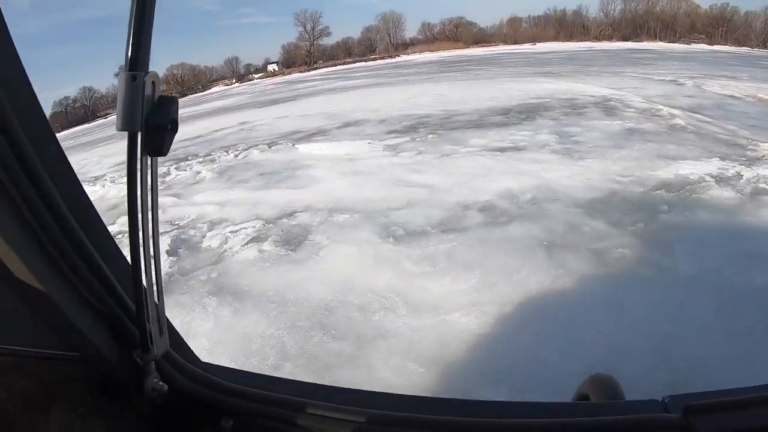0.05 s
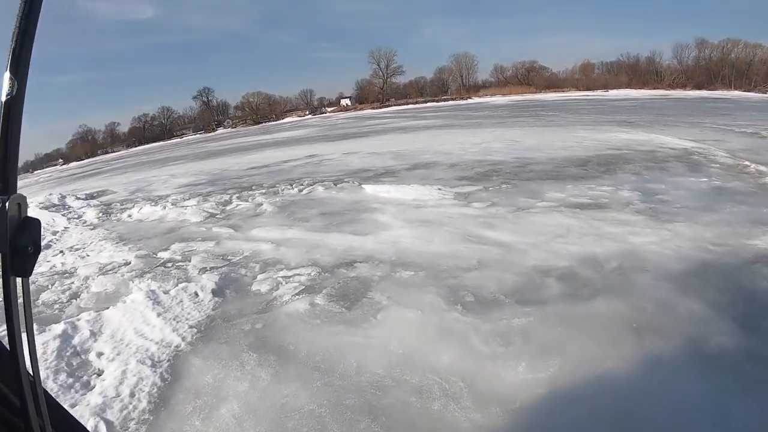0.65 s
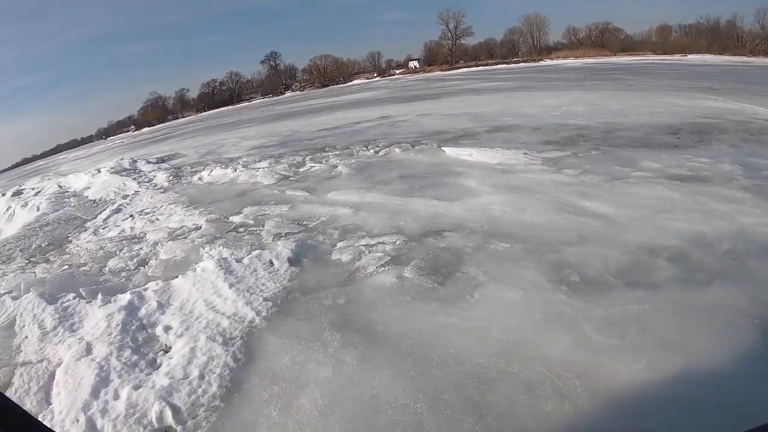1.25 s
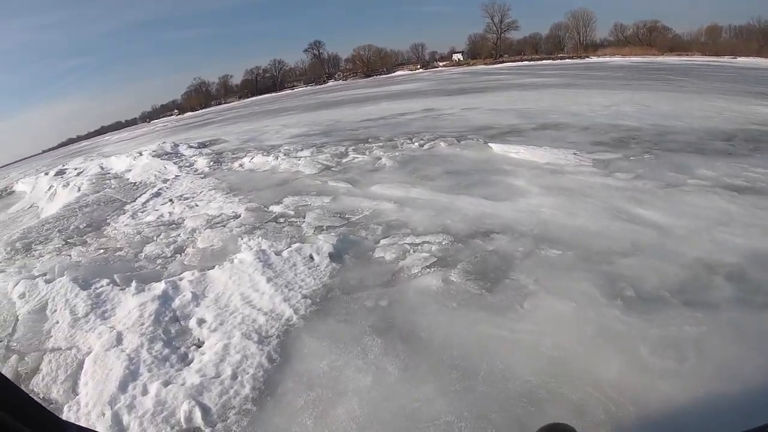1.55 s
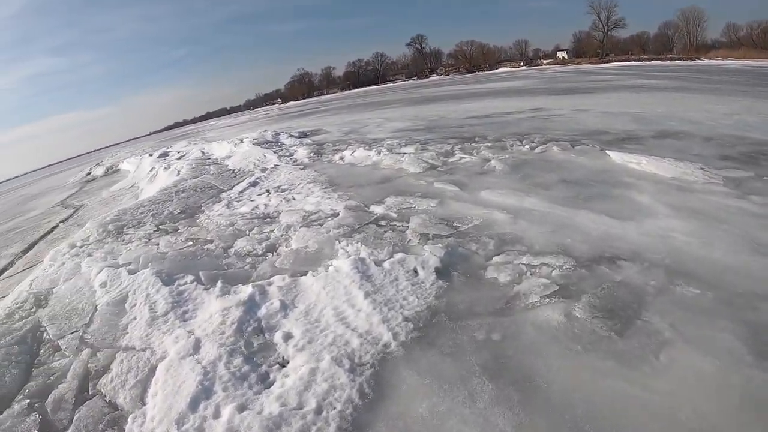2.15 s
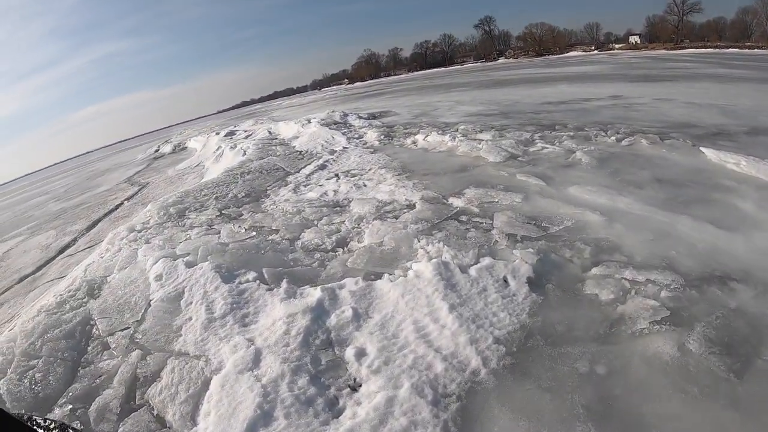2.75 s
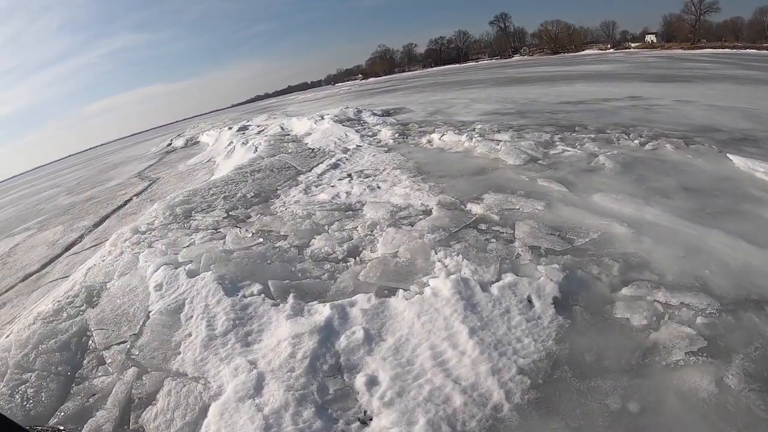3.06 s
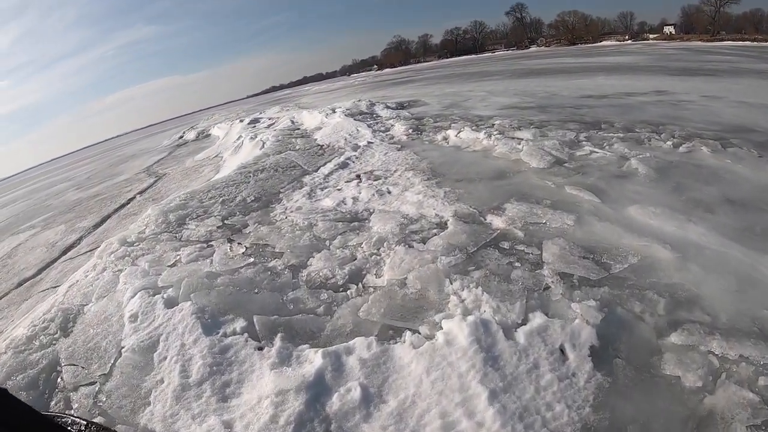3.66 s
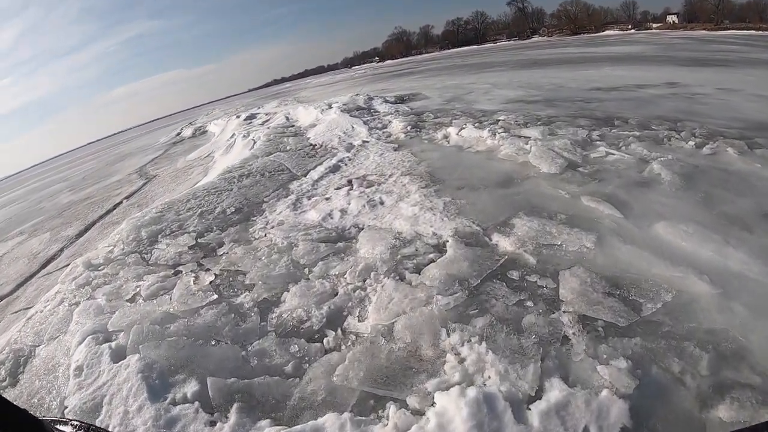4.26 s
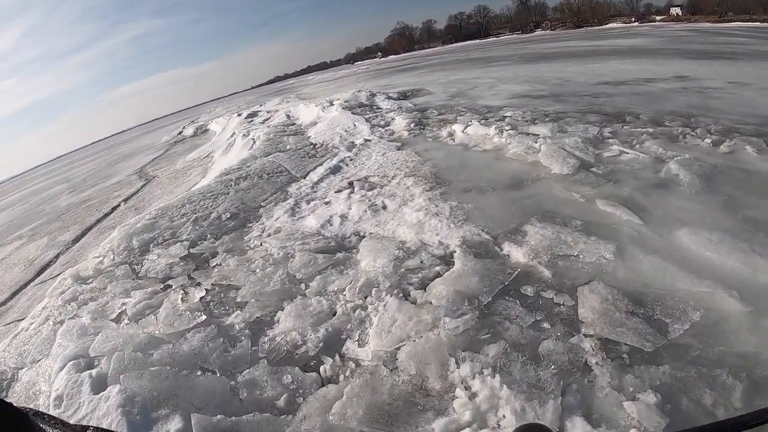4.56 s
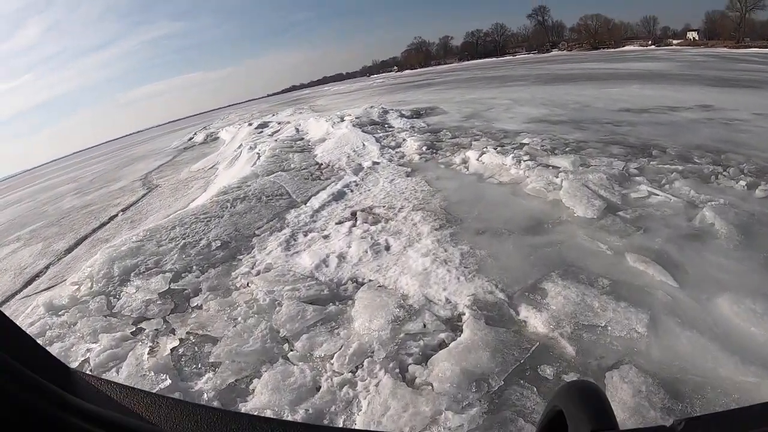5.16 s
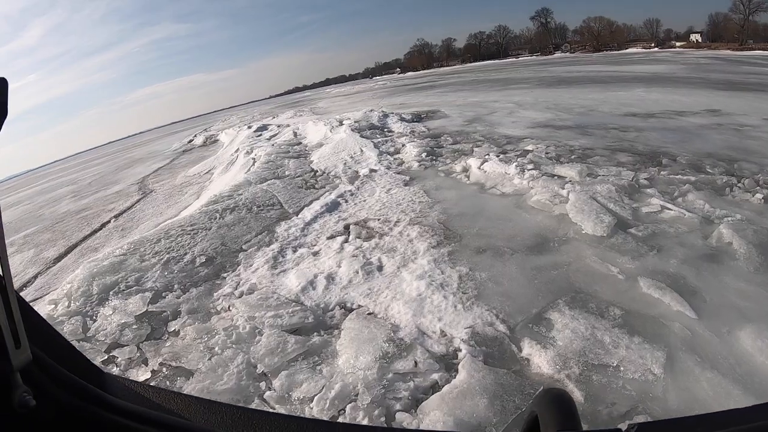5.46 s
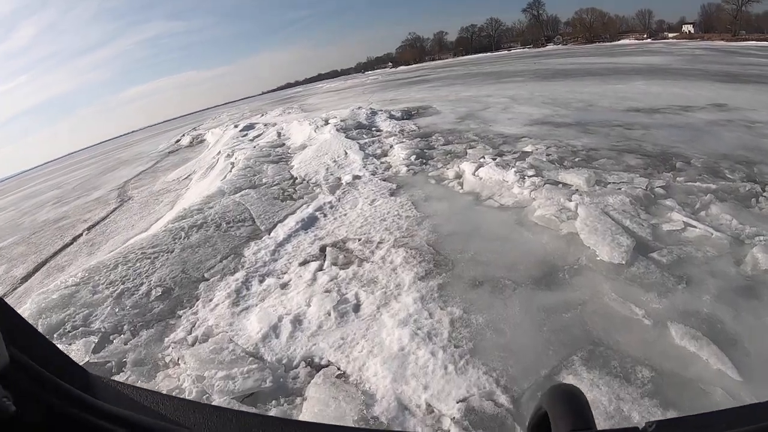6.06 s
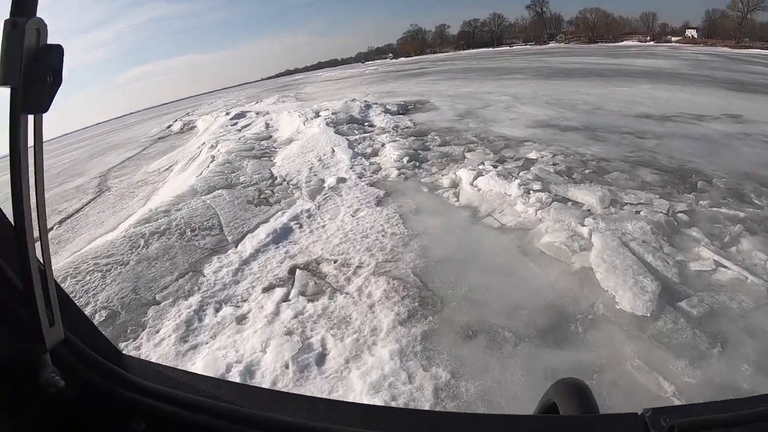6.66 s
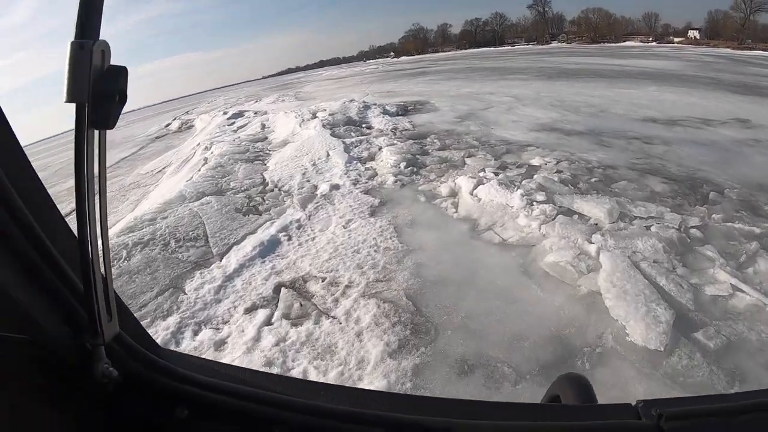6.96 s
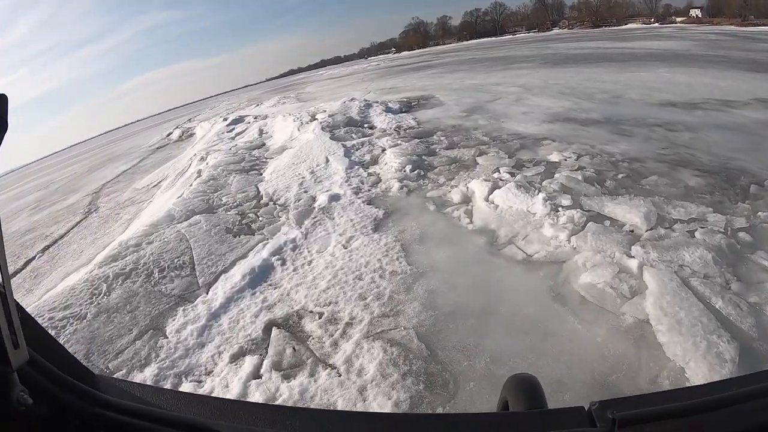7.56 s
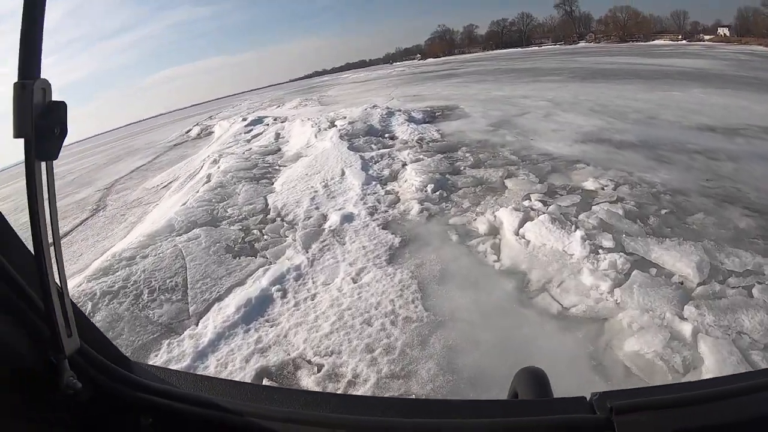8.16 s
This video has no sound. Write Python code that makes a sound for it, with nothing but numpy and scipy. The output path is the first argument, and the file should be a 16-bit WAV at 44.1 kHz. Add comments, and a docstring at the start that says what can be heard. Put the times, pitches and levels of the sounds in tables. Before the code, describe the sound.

A diesel engine drones low and steady for the whole eight seconds or so, heard inside the booming cab of an off-road vehicle. Its speed barely changes. A light clatter, a thin wavering whine and a faint airy whistle sit above the drone, while soft tyres rumble over ice below it. Snow crunches and squeaks very faintly under the tread. The drone dips briefly with soft bumps at about 1.4 and 3 seconds. A light, sharp knock comes at 4.5 seconds, then louder hollow bodywork knocks at 5.5 and 5.7 seconds. A faint ice crackle follows near 6.3 seconds. The ride gets rougher around 7 seconds, with a quick cluster of rattling knocks and a deep tyre thud at 7.6 seconds. The drone wavers over these bumps and carries on to the end.

```python
"""Diesel cab on a frozen lake

Inside an all-terrain vehicle at an even pace. The exhaust drones at the firing rate, the cab booms,
and the engine clatters under a thin whine and an airy whistle. Big soft tyres rumble and crunch
over snowy ice that squeaks and snaps, and a few bumps make the bodywork knock."""
import sys
import numpy as np
from scipy import signal
from scipy.fft import rfft, irfft
from scipy.io import wavfile
from scipy.ndimage import uniform_filter1d

SR = 44100
rng = np.random.default_rng(int(sys.argv[2]) if len(sys.argv) > 2 else 0)


def int16_out(signal):
    """Quantize to a 16-bit WAV file."""
    q = np.round(np.clip(np.atleast_2d(signal).T, -1, 1) * 32767)
    wavfile.write(sys.argv[1], SR, q.astype(np.int16))


N = 366464
T = np.arange(N) / SR


def from_db(db):
    """Decibels to gain."""
    return 10 ** (np.asarray(db) / 20)


def unit_power(x):
    """Scale to an RMS of one."""
    return x / np.sqrt(np.mean(x ** 2) + 1e-20)


def automation(rows):
    """Breakpoints to curves, one for each column after the time."""
    times, *columns = np.transpose(rows)
    return [np.interp(T, times, column) for column in columns]


def swell(t, spread):
    """A bell-shaped fade in and out around time t."""
    return np.exp(-.5 * np.minimum(((T - t) / spread) ** 2, 100))


def drift(rate_hz):
    """A smooth random modulator of unit power."""
    hz = np.fft.rfftfreq(N, 1 / SR)
    return unit_power(irfft(rfft(rng.standard_normal(N)) / (1 + (hz / rate_hz) ** 2) ** 2, N))


def clicks(per_s):
    """Scattered impulses of random strength."""
    return (rng.random(N) < per_s / SR) * rng.standard_normal(N)


def equalise(x, curve):
    """Apply an EQ curve that rolls off beyond its ends; unit power."""
    hz = np.fft.rfftfreq(N, 1 / SR) + 1e-3
    points_hz, points_db = np.transpose(curve)
    gain = from_db(np.interp(np.log(hz), np.log(points_hz), points_db))
    ends = np.minimum(hz / points_hz[0], 1) * np.minimum(points_hz[-1] / hz, 1)
    return unit_power(irfft(rfft(x) * gain * ends ** 2, N))


def resonate(x, modes):
    """Parallel resonators of alternating polarity; unit power."""
    out = 0
    for k, (hz, width, db) in enumerate(modes):
        r = np.exp(-np.pi * width / SR)
        zeros = [(1 - r * r) / 2, 0, (r * r - 1) / 2]
        poles = [1, -2 * r * np.cos(2 * np.pi * hz / SR), r * r]
        out = out + (-1) ** k * from_db(db) * signal.lfilter(zeros, poles, x + 1e-18)
    return unit_power(out)


def pass_filter(x, hz, kind):
    """Second-order low- or high-pass."""
    return signal.sosfilt(signal.butter(2, min(hz, SR / 2 - 1), kind, fs=SR, output="sos"), x)


def firing_noise(firings, depth, decay_cycles, uneven_db):
    """Noise that flares at each firing and falls back; no two firings are equally strong."""
    index = firings.astype(int) - int(firings.min())
    strength = from_db(uneven_db * rng.standard_normal(N)[index])
    flare = unit_power(strength * np.exp(-(firings % 1) / decay_cycles))
    return unit_power(rng.standard_normal(N) * (1 + depth * flare))


# how hard the engine shakes the cab: t/s, level/dB
CAB_SHAKE = [(0, -18), (0.6, -22), (0.8, -19), (1.15, -21.5), (1.55, -17.5), (1.78, -19.5), (2.0, -19),
             (2.3, -20.5), (2.88, -18.5), (3.04, -26.5), (3.25, -26), (3.5, -19.5), (4.1, -21.5),
             (4.42, -23.5), (4.58, -19.5), (5.5, -21), (6.08, -23), (6.36, -20.5), (6.6, -22),
             (6.85, -18.5), (7.0, -30), (7.12, -23.5), (7.3, -31), (7.6, -23.5), (8.05, -22.5),
             (8.22, -28.5), (8.31, -27)]
# air modes of the cab: f/Hz, width/Hz, gain/dB
AIR_MODES = [(178.3, 15.9, 2), (220.7, 16.5, 2), (253.8, 28.6, -3.5), (317.3, 35, -7.5), (367.6, 53.5, -9)]
def cab_boom(firings, trim_db=-5.5):
    """Uneven firings set the air in the cab booming."""
    shake_db, = automation(CAB_SHAKE)
    air = resonate(firing_noise(firings, depth=0.38, decay_cycles=0.24, uneven_db=0.37), AIR_MODES)
    air = pass_filter(pass_filter(air, 430, "low"), 112, "high")
    return from_db(shake_db + trim_db) * unit_power(air)


# engine load, riding the clatter and the exhaust's overtones: t/s, gain/dB
ENGINE_LOAD = [(0, 0.7), (3.4, 0.05), (4.6, -0.4), (6.4, 0.07), (7.3, -0.2), (8.31, 0.5)]
# tone of the engine block: f/Hz, gain/dB
BLOCK_EQ = [(200, -8.5), (400, 4.5), (700, 3), (1000, -2.5), (1350, -5.5), (2000, -10), (3000, -17),
            (3700, -21), (4600, -23.5), (5100, -32), (5600, -39.5), (8000, -48.5)]
# ringing panels: f/Hz, width/Hz, gain/dB
PANEL_RING = [(458.4, 50, -4), (531, 31, -1), (588.5, 30.3, 0), (624.5, 31, 1), (688, 38, -5),
              (781, 49, -9)]
def clatter(firings, block_db=-37, panels_db=-35.5):
    """Combustion knock: broad bursts from the block, and the panels that they set ringing."""
    block = equalise(firing_noise(firings, depth=0.15, decay_cycles=0.34, uneven_db=2.6), BLOCK_EQ)
    panels = resonate(firing_noise(firings, depth=0.51, decay_cycles=0.49, uneven_db=2.3), PANEL_RING)
    panels = unit_power(pass_filter(pass_filter(panels, 980, "low"), 325, "high"))
    load_db, = automation(ENGINE_LOAD)
    return from_db(load_db + block_db) * block + from_db(load_db + panels_db) * panels


# rumble from rough ice: t/s, level/dB
ICE_ROUGHNESS = [(0, -21), (0.4, -22), (3.0, -25), (4.3, -26), (5.2, -27.5), (6.9, -19.5), (7.35, -28),
                 (7.7, -20.5), (8.31, -24)]
# wheels dropping over ridges: t/s, thud level/dB, drone ducking/dB, spread/s
RIDGES = [(1.442, -22, 12, 0.03), (2.96, -23.5, 5.5, 0.095), (6.308, -36, 9, 0.03),
          (6.93, -22, -1.5, 0.031), (7.098, -33, 9.5, 0.045), (7.585, -11, 2, 0.03),
          (7.722, -28, 8.5, 0.063), (8.2, -30, 4, 0.084)]
# low end of the tyres: f/Hz, gain/dB
RUMBLE_EQ = [(10, -13), (20, -12), (32, -3), (43, -5.5), (70, 1.5), (90, -3.5), (107, 1), (124, -6),
             (160, -9), (260, -34)]
def tyre_rumble():
    """Soft tyres rumble over the ice and thud on ridges."""
    rumble_db, = automation(ICE_ROUGHNESS)
    thuds = sum(from_db(db) * swell(t, spread) for t, db, _, spread in RIDGES)
    return np.hypot(from_db(rumble_db), thuds) * equalise(rng.standard_normal(N), RUMBLE_EQ)


# partials of the drone: multiple of the firing rate, relative level/dB, waver/dB
DRONE_PARTIALS = [(.5, -24.5, 8), (1, 2, 0), (4, -29, 4), (5, -30, 5.5), (8, -32.5, 6)]
# hum an octave above the firing rate: t/s, level/dB
OCTAVE_HUM = [(0, -24.5), (0.85, -25), (1.03, -29), (1.3, -25), (2.0, -27.5), (2.85, -26), (4.1, -25.5),
              (4.55, -31.5), (5.0, -27.5), (6.4, -26.5), (7.8, -28.5), (8.31, -37)]
def exhaust(firings, base_db=-17, waver_db=0.5, load_follow=1.5):
    """Exhaust pulses make a drone that most ridges duck; its second and third orders ride separately."""
    def partial(order):
        # pipe and cab delay the higher orders more
        return np.sqrt(2) * np.cos(2 * np.pi * order * firings - np.pi / 2 * (order - 1) ** 2)
    shake_db, = automation(CAB_SHAKE)
    load_db, = automation(ENGINE_LOAD)
    octave_db, = automation(OCTAVE_HUM)
    duck_db = sum(db * swell(t, spread) for t, _, db, spread in RIDGES)
    drone_db = base_db + waver_db * drift(19) - duck_db
    drone = 0
    for order, db, unsteady_db in DRONE_PARTIALS:
        lift_db = (order > 1) * load_follow * load_db
        drone += from_db(drone_db + db + lift_db + unsteady_db * drift(5.5)) * partial(order)
    return drone + from_db(octave_db) * partial(2) + from_db(shake_db - 5.5) * partial(3)


# faders of the whine: t/s, upper tone/dB, lower tone/dB
WHINE_FADERS = [(0, -41, -34), (0.55, -43.5, -53), (1.1, -36.5, -44), (1.6, -49, -38),
                (2.079, -36.5, -39.5), (2.4, -45, -38), (3.1, -40.5, -39), (3.55, -38, -36.5),
                (4.001, -37.5, -39.5), (4.5, -40, -36), (4.9, -34.5, -48), (5.15, -36.5, -51),
                (5.8, -35.5, -51.5), (6.3, -41.5, -44), (6.5, -34.5, -44), (6.799, -42, -48),
                (7.35, -35.5, -50), (7.7, -41.5, -42), (8.31, -39, -48)]
def whine(firings, orders=(10, 9), trim_db=-1.5, waver_db=1.2, wobble_cycles=.05):
    """Two thin tones follow the crankshaft, with a slight wobble in pitch."""
    wobble = wobble_cycles * drift(4)
    out = 0
    for order, db in zip(orders, automation(WHINE_FADERS)):
        tone = np.sqrt(2) * np.sin(2 * np.pi * (order * firings + wobble))
        out += from_db(db + trim_db + waver_db * drift(5.1)) * tone
    return out


# glide of the whistle: t/s, f/Hz, level/dB
WHISTLE_GLIDE = [(0, 1221, -49), (1.3, 1156, -49), (2.25, 904, -47), (3.3, 925, -43.5), (6.2, 948, -47.5),
                 (6.8, 1096, -50), (7.2, 1229, -49), (7.55, 1117, -49.5), (8.31, 946, -47)]
def whistle(width_hz=130):
    """An airy whistle from the engine bay: a narrow band of noise that wanders in pitch."""
    hz, db = automation(WHISTLE_GLIDE)
    phase = 2 * np.pi * np.cumsum(hz) / SR
    return from_db(db) * (drift(width_hz) * np.cos(phase) + drift(width_hz) * np.sin(phase))


# bed of snow under the tyres: t/s, level/dB
SNOW_BED = [(0, -63), (0.3, -73), (0.55, -68), (1.1, -69.5), (1.85, -68.5), (2.15, -69.5), (2.5, -67.5),
            (3.05, -67.5), (3.6, -67.5), (4.6, -68), (5.1, -70.5), (6.15, -70.5), (6.55, -69.5), (6.9, -68),
            (7.15, -69), (7.4, -73.5), (7.7, -69), (8.2, -68.5)]
# crusts caving in: t/s, level/dB
SNOW_CRUSTS = [(.36, -64), (.59, -62), (.76, -69), (.9, -62), (1.0, -65), (1.183, -61), (1.452, -60),
               (1.73, -64), (1.998, -59), (4.81, -64), (5.35, -67), (5.72, -67), (5.81, -66), (6.29, -64),
               (6.39, -65.5), (7.2, -69)]
# sheen of the hiss: f/Hz, gain/dB
HISS_EQ = [(3500, -20), (5000, -5.5), (5700, -12.5), (6600, -1.5), (7300, -2.5), (8300, -8.5),
           (10000, -10.5), (12000, -28)]
# bite of the crunch: f/Hz, gain/dB
CRUNCH_EQ = [(2000, 3), (4500, 9), (5700, -3), (7500, 4), (8600, -3.5), (10200, -5.5), (10900, -7.5),
             (12500, -5.5), (14000, -13), (16000, -17.5)]
def snow_crunch(trim_db=2.5, accent_db=2.0, flutter_db=3.5, crust_spread_s=0.019):
    """Snow hisses and breaks in small grains under the tread, flaring where a crust collapses."""
    snow_db, = automation(SNOW_BED)
    hiss = from_db(snow_db + trim_db) * equalise(rng.standard_normal(N), HISS_EQ)
    grains = clicks(per_s=13000) * from_db(accent_db * np.minimum(rng.exponential(1, N), 5))
    rolling = from_db(snow_db + trim_db + flutter_db * np.tanh(drift(14)))
    collapsing = sum(from_db(db) * swell(t, crust_spread_s) for t, db in SNOW_CRUSTS)
    return hiss + (rolling + collapsing) * equalise(grains, CRUNCH_EQ)


# squeaks and groans: t/s, level/dB, f/Hz, spread/s, resonator half-width as a share of f
SQUEAK_CUES = [(1.0, -48.5, 2020, 0.18, .2), (0.16, -57.5, 2400, 0.28, 0.062),
               (1.3, -62, 4020, 0.99, 0.079), (2.425, -63, 7130, 0.025, .005),
               (2.5, -68.5, 7820, 0.43, .07), (6.35, -46, 1400, 0.054, 0.23),
               (7.985, -63.5, 6150, .03, .04), (0.946, -36, 333, 0.081, .12), (1.97, -32.5, 314, .07, 0.11),
               (4.104, -32.5, 323, 0.089, 0.14), (6.2, -36.5, 434, .2, .1), (8.07, -33, 390, 0.075, 0.26)]
def squeaks():
    """Packed snow and ice rub on rubber in narrow bands."""
    out, rubbing = np.zeros(N), rng.standard_normal(N)
    for t, db, hz, spread, half_width in SQUEAK_CUES:
        band = [(hz, 2 * half_width * hz, 0)]
        out += from_db(db) * swell(t, spread) * resonate(resonate(rubbing, band), band)
    return out


# snapping shards: t/s, level/dB, spread/s
SHARD_CUES = [(1.452, -52, 0.025), (5.343, -55, .012), (6.34, -51, 0.029)]
# brittle tone of the ice: f/Hz, gain/dB
SHARD_EQ = [(1000, -8), (1900, 3), (3000, 8), (4600, 2), (5600, -16), (9000, -30)]
def ice_shards():
    """Thin ice gives way in short, dry crackles."""
    envelope = sum(from_db(db) * swell(t, spread) for t, db, spread in SHARD_CUES)
    return envelope * equalise(clicks(per_s=9000), SHARD_EQ)


# gritty scrapes: t/s, level/dB, f/Hz, spread/s
SCRAPE_CUES = [(2.76, -66, 6150, .08), (3.365, -63.5, 6300, 0.13), (3.65, -62, 6500, 0.064),
               (4.05, -63.5, 6400, 0.17), (4.64, -64, 6500, .045), (5.345, -64, 6100, .012),
               (6.7, -68, 6000, .04), (6.87, -67, 6300, 0.1), (7.97, -64, 6300, .04)]
# formants of a scrape: multiple of its f, gain/dB
SCRAPE_FORMANTS = [(1, 2), (1.55, -11.5), (1.9, -13)]
def snow_scrapes(width_hz=550, flutter_db=0.5, low_cut_hz=4600):
    """The tyres slide through crusty snow: swells of grit, each around its own pitch."""
    out, grit = np.zeros(N), clicks(per_s=700)
    for t, db, hz, spread in SCRAPE_CUES:
        bands = [(ratio * hz, width_hz, band_db) for ratio, band_db in SCRAPE_FORMANTS]
        out += from_db(db) * swell(t, spread) * resonate(grit, bands)
    out = pass_filter(pass_filter(out, low_cut_hz, "high"), low_cut_hz, "high")
    return from_db(flutter_db * drift(22)) * out


# knocks and their rebounds: t/s, peak level/dB, f/Hz
KNOCK_CUES = [(4.463, -22.5, 1850), (4.478, -30, 1500), (5.505, -15, 200), (5.5062, -13, 503),
              (5.5122, -19, 520), (5.705, -24.5, 1100), (5.714, -19.5, 1145), (5.718, -13.5, 684),
              (7.057, -19, 880), (7.06, -17, 680), (7.077, -20, 800), (7.107, -15.5, 200),
              (7.181, -21, 730)]
# ringing bodywork: f/Hz, width/Hz, gain/dB
BODY_RING = [(183, 40, 2), (517, 87, 4), (616, 29, 6.5), (660, 9, -8), (820, 72, -7.5), (948, 45, 1),
             (1076, 40, -3), (1380, 55, -2.5), (1555, 57, -3), (1820, 83, -5), (2390, 79, -4),
             (3060, 80, 0), (3820, 120, -6)]
# tone of the rattle: f/Hz, gain/dB
RATTLE_EQ = [(100, 11), (300, -7), (600, 6.5), (1000, -10), (2000, -7), (4500, 0.5), (5600, -32),
             (12000, -42)]
def body_knocks(reach_octaves=0.37, rattle_db=-6, rattle_s=0.018, brightness=1.4):
    """Each soft contact rings the bodywork's modes around its own pitch, with a brief rattle."""
    out, size = np.zeros(N), SR // 4
    age = T[:size]
    rattle = equalise(rng.standard_normal(N), RATTLE_EQ)
    for t, db, hz in KNOCK_CUES:
        at = int(t * SR)
        ring = 0
        for mode_hz, width, mode_db in BODY_RING:
            strength = from_db(mode_db) * np.exp(-(np.log2(mode_hz / hz) / reach_octaves) ** 2)
            ring += strength * np.exp(-np.pi * width * age) * np.sin(2 * np.pi * mode_hz * age)
        contact = pass_filter(rattle[at:at + size] * np.exp(-age / rattle_s), hz / 2, "high")
        knock = ring / np.abs(ring).max() + from_db(rattle_db) * contact / np.abs(contact).max()
        knock = pass_filter(pass_filter(knock, brightness * hz, "low"), brightness * hz, "low")
        out[at:at + size] += from_db(db) * knock / np.abs(knock).max()
    return out


# splitting plates: t/s, peak level/dB, f/Hz
CRACK_CUES = [(4.465, -38, 2300), (4.798, -53, 7000), (4.817, -45, 3800), (5.341, -55, 6030),
              (5.369, -45, 4430), (5.415, -40, 2690)]
def ice_cracks(ring_s=0.0043):
    """Small plates of ice split with a short, pitched tick."""
    out = np.zeros(N)
    for t, db, hz in CRACK_CUES:
        at = int(t * SR)
        age = T[:min(SR // 10, N - at)]
        out[at:at + len(age)] += from_db(db) * np.exp(-age / ring_s) * np.sin(2 * np.pi * hz * age)
    return out


# engine speed: t/s, firing rate/Hz
FIRING_RATE = [(0, 65.2), (0.5, 65.4), (0.8, 64.9), (1.0, 65.4), (1.5, 65.05), (2.1, 65.6), (2.4, 65.2),
               (4.2, 65.79), (4.65, 65.6), (4.87, 66.3), (5.05, 65.1), (5.45, 65.65), (5.8, 66.2),
               (6.3, 64.5), (6.5, 65.2), (6.8, 64.3), (7.15, 64.4), (7.45, 65.4), (7.65, 63.9),
               (7.95, 64.3), (8.2, 65.1)]
def scene():
    """The mono mix: one slightly uneven crankshaft times the engine, over tyres, snow and ice."""
    firing_hz, = automation(FIRING_RATE)
    firings = np.cumsum(firing_hz) / SR + .003 * drift(14)   # phase, one cycle per firing
    engine = exhaust(firings) + whine(firings) + cab_boom(firings) + clatter(firings) + whistle()
    ground = tyre_rumble() + snow_crunch() + snow_scrapes() + squeaks() + ice_shards() + ice_cracks()
    return (engine + ground + body_knocks())[None]


def compress_bass(x, crossover_hz=300, threshold_db=-14.5, squeeze=0.94):
    """A fast compressor turns the bass down whenever it grows too strong."""
    bass = signal.sosfiltfilt(signal.butter(2, crossover_hz, fs=SR, output="sos"), x)
    power = uniform_filter1d(uniform_filter1d(bass ** 2, size=680), size=340)
    over_db = np.maximum(10 * np.log10(np.abs(power) + 1e-12) - threshold_db, 0)
    return x + bass * (from_db(-squeeze * over_db) - 1)


def record(dry):
    """Master chain: bass compression, 4 ms fades at both ends and a steep high cut."""
    fades = np.sin(np.pi / 2 * np.minimum(np.minimum(T, T[::-1]) / .004, 1)) ** 2
    high_cut = signal.cheby2(12, 70, 16500, fs=SR, output="sos")
    return signal.sosfilt(high_cut, fades * compress_bass(dry))


dry = scene()
out = record(dry)
int16_out(out)
```